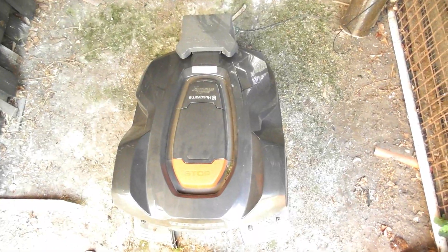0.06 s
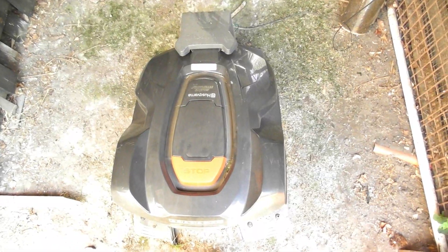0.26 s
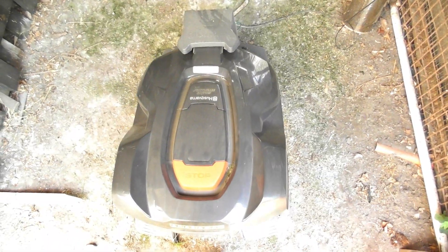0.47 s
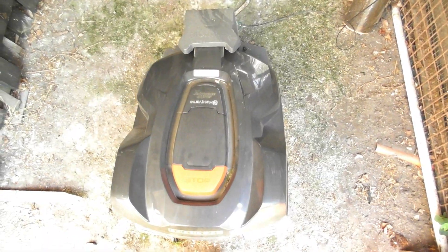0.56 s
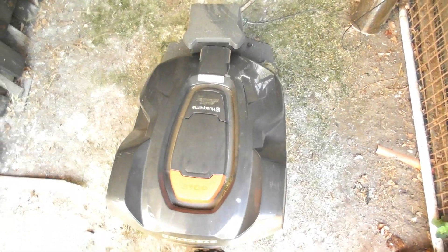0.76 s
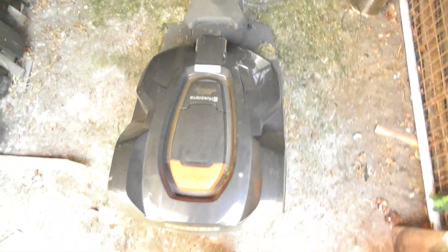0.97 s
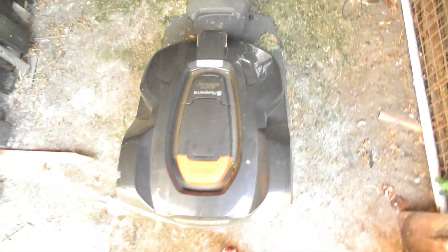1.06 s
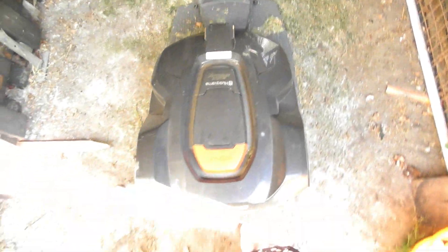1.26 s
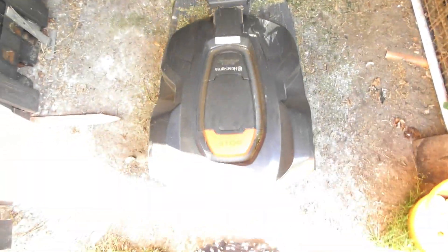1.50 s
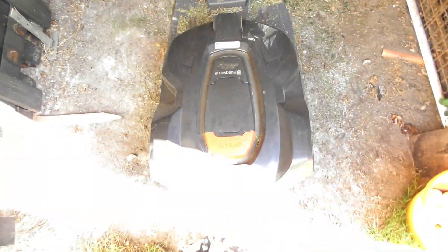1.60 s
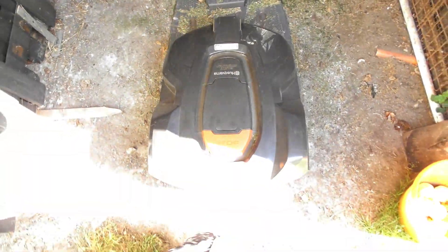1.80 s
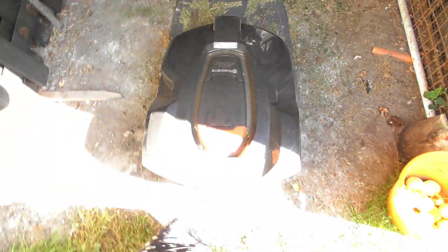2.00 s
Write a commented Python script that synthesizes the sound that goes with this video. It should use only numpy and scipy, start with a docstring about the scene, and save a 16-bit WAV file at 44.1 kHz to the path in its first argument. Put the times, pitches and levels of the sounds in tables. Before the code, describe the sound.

A robotic lawn mower knocks and clicks out of its dock, then rolls with low rumble

```python
"""A robotic lawn mower backs out of its charging dock in a garden and rolls over hard ground. Close by, hollow
knocks (bands of noise and ringing modes) and sharp plastic clicks crowd the first 0.8 s, then thin out. Random
bumps rumble in the shell over a soft bass, wavering tones make the low motor hum, and coloured random grains
make the gritty hiss and crunch. Faint falling chirps, sliding bands of noise, sound far off at the start and
again at about 1.3 s."""
import sys
import numpy as np
from scipy import signal
from scipy.fft import rfft, irfft, next_fast_len
from scipy.io import wavfile

SR = 44100
rng = np.random.default_rng(int(sys.argv[2]) if len(sys.argv) > 2 else 0)


def generate_wav(signal):
    """Clip the signal to [-1, 1] and save it as 16-bit WAV at the path in sys.argv[1]."""
    frames = np.transpose(np.atleast_2d(signal))
    scaled = np.clip(frames, -1, 1) * 32767
    pcm = np.round(scaled).astype(np.int16)
    wavfile.write(sys.argv[1], SR, pcm)


N = 90404
T = np.arange(N) / SR
SIZE = 2 * next_fast_len(N // 2 + SR // 4)  # FFT length, with room for filter tails
FREQS = np.maximum(np.arange(SIZE // 2 + 1) * SR / SIZE, 1)


def from_db(db):
    """Decibels to gain."""
    return 10 ** (np.asarray(db) / 20)


def rms_one(x):
    """Scale to rms 1."""
    return x / np.sqrt(np.mean(x ** 2) + 1e-20)


def level(rows):
    """Gain over time from (t/s, level/dB) rows."""
    return from_db(np.interp(T, *np.transpose(rows)))


def gains(points):
    """Gain over frequency from (f/Hz, level/dB) rows, drawn on a log frequency axis."""
    hz, db = np.transpose(points)
    return from_db(np.interp(np.log(FREQS), np.log(hz), db))


def colour(x, points, tilt_db=0):
    """Minimum-phase filter with the given spectrum and tilt in dB per octave; white noise keeps its power."""
    octaves = np.log2(np.maximum(FREQS, points[0][0]))
    gain = rms_one(gains(points) * from_db(tilt_db * octaves))
    # folding the cepstrum forward in time makes the filter causal
    cepstrum = irfft(np.log(gain + 1e-9))
    cepstrum[1:SIZE // 2] *= 2
    cepstrum[SIZE // 2 + 1:] = 0
    response = np.exp(rfft(cepstrum))
    return irfft(rfft(x, SIZE) * response)[..., :N]


def stereo(pair, width):
    """Left and right from a middle sound and an unrelated side sound, weighted by the width spectrum."""
    middle = pair[0]
    side = irfft(rfft(pair[1], SIZE) * gains(width))[:N]
    return np.array([middle + side, middle - side])


def drift(rate):
    """Random wander, rms 1, whose spectrum is 6 dB down at rate in Hz."""
    spectrum = rfft(rng.standard_normal(SIZE)) / (1 + (FREQS / rate) ** 2)
    return rms_one(irfft(spectrum)[:N])


def ring(x, hz, t60):
    """Two-pole resonator: a unit click sets a sine of initial height 1 ringing."""
    radius = from_db(-60 / (t60 * SR))
    angle = 2 * np.pi * hz / SR
    return signal.lfilter([0, np.sin(angle)], [1, -2 * radius * np.cos(angle), radius * radius], x + 1e-18)


def blow(s, t60, attack):
    """Envelope of a contact: quick attack, exponential decay."""
    age = np.maximum(T - s, 0)
    rise = np.sin(np.pi / 2 * np.minimum(age / attack, 1)) ** 2
    return rise * np.exp(-np.log(1000) * np.minimum(age / t60, 2))


def grains(per_s, spread_db):
    """Two random streams of tiny contacts of uneven size and either sign, rms 1."""
    sizes = from_db(spread_db * np.minimum(rng.exponential(1, (2, N)), 5))
    signed = sizes * rng.choice([-1, 1], (2, N))
    return rms_one(signed * (rng.random((2, N)) < per_s / SR))


def shudder(points):
    """Dense plastic modes as coloured noise with its beating evened out, rms 1."""
    x = colour(rng.standard_normal((2, N)), points)
    even = np.cos(np.angle(signal.hilbert(x, SIZE)))  # keep the phase, drop the envelope
    passband = np.minimum(gains(points) / gains(points).max() * 2, 1)
    return rms_one(irfft(rfft(even) * passband)[:, :N])


# hollow knocks: t/s, thud level/dB, clack level/dB, ring level/dB, f/Hz of the pitch that rings most
KNOCK_HITS = [(0.082, -36, -41, -59, 480), (0.096, -29.5, -29, -41, 840), (0.110, -33, -28, -27, 480),
              (0.118, -22, -20, -22, 460), (0.191, -44, -33, -44, 760), (0.264, -18.5, -31, -13, 523),
              (0.27, -25, -21.5, -23.5, 849), (0.306, -18, -37, -21.5, 412), (0.377, -20.5, -44, -39, 412),
              (0.403, -22, -37, -30, 302), (0.431, -23, -19.5, -23, 283), (0.482, -21.5, -23.5, -19, 350),
              (0.490, -28, -19, -39, 864), (0.519, -22, -40, -21.5, 350), (0.570, -18.5, -40, -24, 325),
              (0.598, -22, -31, -23.5, 480), (0.666, -20, -19, -24, 630), (0.683, -15, -25, -20.5, 329),
              (0.691, -20.5, -59, -16.5, 614), (0.709, -30, -34, -37, 596), (0.726, -18.5, -46, -27.5, 600),
              (0.790, -28, -33, -28, 687), (1.005, -36, -40.5, -29.5, 291), (1.026, -28, -48, -44, 435),
              (1.082, -27.5, -32.5, -48, 410), (1.160, -27.5, -37.5, -45, 680),
              (1.381, -25.5, -27.5, -39, 474), (1.399, -23, -35.5, -39, 415), (1.424, -24.5, -35, -39, 420),
              (1.458, -25.5, -38.5, -44, 358), (1.516, -28.5, -34.5, -34.5, 487),
              (1.783, -28, -44, -38, 480), (1.839, -46, -31.5, -60, 770), (1.986, -34, -45.5, -34, 490)]
# relative spectrum of the dead thud: f/Hz, level/dB
THUD_SPECTRUM = [(40, -55.5), (150, -11.5), (240, -6.5), (330, 0.5), (500, 6), (620, -3.5), (900, -22),
                 (1500, -41), (3000, -61.5)]
# relative spectrum of the clack: f/Hz, level/dB
CLACK_SPECTRUM = [(200, -31.5), (520, -12.5), (700, -5.5), (880, -2.5), (1150, -10), (1350, -14.5),
                  (1600, -62), (3000, -62)]
# hollow modes rung by the knocks, also heard in the rolling: f/Hz, relative level/dB, t60/s
SHELL_MODES = [(292.9, 5, 0.21), (347, 2.5, 0.31), (403.5, -32, 0.34), (475, 3, 0.098), (509, 1.5, 0.11),
               (589.6, -7, 0.41), (695.3, 4.5, 0.062), (785, 13, 0.065), (898, 13, 0.027), (1007, 0, 0.048)]
# stereo spread of the knocks, also used for the rolling: f/Hz, side level/dB against middle
BODY_SPREAD = [(50, -12.5), (150, -9.5), (350, -15.5), (600, -16), (1100, -9.5), (1500, -26)]
THUD_T60_S, CLACK_T60_S, KNOCK_ATTACK_S = 0.068, 0.059, 0.0042
RING_WIDTH_OCT, RING_FLOOR_DB = 0.14, -22.5  # how far a knock reaches to other modes
RING_WAVER_HZ, RING_WAVER_RATE_HZ = 4.02, 19.4
RING_LOW_HZ, RING_HIGH_HZ = 196, 1176
CLACK_LEFT_DB = 0.2  # left raised, right lowered by this


def knocks():
    """Each knock is a thud and a clack, and feeds hollow modes near its pitch; their energy adds up and dies
    away."""
    s, thud_db, clack_db, ring_db, pitch = np.transpose(KNOCK_HITS)
    thud_level = sum(from_db(db) * blow(at, THUD_T60_S, KNOCK_ATTACK_S) for at, db in zip(s, thud_db))
    clack_level = sum(from_db(db) * blow(at, CLACK_T60_S, KNOCK_ATTACK_S) for at, db in zip(s, clack_db))
    thud = thud_level * shudder(THUD_SPECTRUM)
    clack = clack_level * shudder(CLACK_SPECTRUM)
    rings = 0
    for hz, db, t60 in SHELL_MODES:
        near = np.exp(-(np.log2(hz / pitch) / RING_WIDTH_OCT) ** 2) + from_db(RING_FLOOR_DB)
        hits = np.bincount((s * SR).astype(int), (from_db(ring_db + db) * near) ** 2, N)
        energy = signal.lfilter([1], [1, -np.exp(-2 * np.log(1000) / (t60 * SR))], hits + 1e-18)
        wavering_hz = hz + RING_WAVER_HZ * drift(RING_WAVER_RATE_HZ)
        cycles = np.cumsum(wavering_hz) / SR + rng.random((2, 1))
        rings = rings + np.sqrt(energy) * np.sin(2 * np.pi * cycles)
    band = signal.butter(5, [RING_LOW_HZ, RING_HIGH_HZ], "band", fs=SR, output="sos")
    rings = signal.sosfilt(band, rings)
    clack_balance = from_db([[CLACK_LEFT_DB], [-CLACK_LEFT_DB]])
    return stereo(thud + rings, BODY_SPREAD) + stereo(clack, BODY_SPREAD) * clack_balance


# sharp clicks: t/s, level/dB, t60/s, tilt/dB per octave, sparkle level/dB
CLICK_HITS = [(0.101, -46, 0.21, 2.5, -3), (0.1259, -33.5, 0.066, 9, -21), (0.191, -46.5, 0.02, 0, -6),
              (0.2612, -28.5, .045, 0.5, -1), (0.288, -39, 0.054, 5, -12), (0.3263, -39, 0.029, 11, -3),
              (0.4297, -37.5, 0.037, -1.5, 9), (0.4811, -33.5, 0.029, -4.5, 10),
              (0.5735, -40.5, 0.071, -7.5, -2), (0.665, -34.5, .06, -2, 9), (0.674, -38.5, 0.052, 0, 2),
              (0.687, -30.5, 0.057, -9, 12), (0.691, -46, 0.024, 0, 13), (0.786, -47.5, .04, 2, -4),
              (0.949, -50.5, .12, 8, 0), (1.022, -44.5, 0.02, 13, -7), (1.603, -45.5, 0.026, -5.5, 2)]
# relative spectrum of the crack, before tilt and sparkle: f/Hz, level/dB
CRACK_SPECTRUM = [(600, -11), (1700, -5.5), (2400, -8.5), (3500, 1), (4400, -1.5), (5100, -6), (6200, 1.5),
                  (7700, 1.5), (8700, -1), (9600, -8.5), (12000, -11.5), (15500, -24)]
# ringing small hard parts: f/Hz, level/dB against the click before the overall ring level and tilt, t60/s
HARD_PART_MODES = [(2720, -15, .1), (3400, -16, .05), (3664, -7, 0.022), (4570, -14, 0.044),
                   (5800, -8.5, 0.042), (6420, -21, 0.056), (7000, -33, .07), (7770, -3, 0.062),
                   (8780, -8, 0.034)]
# stereo spread of the clicks: f/Hz, side level/dB against middle
CLICK_SPREAD = [(1800, -2), (2500, -14), (3400, -14.5), (5000, -21), (6500, -22), (8500, -7), (11000, 2),
                (15000, -1)]
CLICK_TAIL_DB, CLICK_TAIL_T60_S, ATTACK_S = -11, 0.21, 0.0019
CLICK_GRAINS_PER_S, CLICK_SPREAD_DB = 18000, 2
SPARKLE_HZ, CLICK_RING_DB = 10500, -5


def clicks():
    """Hard plastic snaps: a gritty crack with a faint tail, more or less sparkle on top, and a short bright ring."""
    out = np.zeros((2, N))
    for s, db, t60, tilt_db, sparkle_db in CLICK_HITS:
        tail = from_db(CLICK_TAIL_DB) * blow(s, CLICK_TAIL_T60_S, ATTACK_S)
        envelope = blow(s, t60, ATTACK_S) + tail
        spectrum = [(hz, band_db + sparkle_db * (hz > SPARKLE_HZ)) for hz, band_db in CRACK_SPECTRUM]
        crack = envelope * grains(CLICK_GRAINS_PER_S, CLICK_SPREAD_DB)
        out += from_db(db) * colour(crack, spectrum, tilt_db)
    s, db, _, tilt_db, _ = np.transpose(CLICK_HITS)
    for hz, mode_db, t60 in HARD_PART_MODES:
        hits = np.zeros(N)
        tilted = np.minimum(tilt_db * np.log2(hz / 7000), 3)  # each click's tilt, pivoting at 7 kHz
        # each mode starts one to two attack times into the click
        starts = s + ATTACK_S * rng.uniform(1, 2, len(s))
        hits[(starts * SR).astype(int)] = from_db(db + CLICK_RING_DB + mode_db + tilted)
        out[0] += ring(hits, hz, t60)
    return stereo(out, CLICK_SPREAD)


# level of the rolling rumble, before the shell ring is added: t/s, level/dB
ROLL_LEVEL = [(0, -49), (.07, -52), (.14, -30), (.24, -39), (.33, -33), (.45, -29.5), (.6, -28.5),
              (.74, -31), (.9, -40.5), (1.05, -36.5), (1.15, -38), (1.42, -35.5), (1.57, -36), (1.65, -33),
              (1.9, -40.5), (2.05, -39.5)]
# relative spectrum of the rumble: f/Hz, level/dB
RUMBLE_SPECTRUM = [(60, -11.5), (230, -6.5), (290, -0.5), (380, 0), (470, -0.5), (590, -9.5), (880, -7),
                   (1120, -15.5), (1300, -30.5), (1600, -38.5), (3000, -44.5)]
# level of the bass: t/s, level/dB
BASS_OVER_TIME = [(0, -46.5), (.25, -43.5), (.45, -48), (.55, -61), (.65, -36), (.78, -44), (.9, -50),
                  (1.3, -39), (1.65, -48.5), (2.05, -48)]
# relative spectrum of the bass: f/Hz, level/dB
BASS_SPECTRUM = [(15, 15), (30, -11), (43, 1), (55, -1.5), (82, 9.5), (135, -8), (175, 7.5), (230, -11),
                 (500, 0.5), (1500, -38.5)]
BUMPS_PER_S, BUMP_SPREAD_DB, ROLL_RING_DB = 900, 1.36, -8.5


def rolling():
    """Small bumps under the wheels rumble through the shell and ring its modes, over a soft noise bass."""
    bumps = grains(BUMPS_PER_S, BUMP_SPREAD_DB)
    body = colour(bumps, RUMBLE_SPECTRUM)
    rings = rms_one(sum(from_db(db) * ring(bumps, hz, t60) for hz, db, t60 in SHELL_MODES))
    rings = signal.sosfilt(signal.butter(6, 1100, fs=SR, output="sos"), rings)
    rumble = level(ROLL_LEVEL) * (body + from_db(ROLL_RING_DB) * rings)
    bass = level(BASS_OVER_TIME) * colour(rng.standard_normal((2, N)), BASS_SPECTRUM)
    return stereo(rumble + bass, BODY_SPREAD)


# tones of the drive hum, around which pitch and level waver: f/Hz, rms level/dB
HUM_TONES = [(94, -51), (116, -52.5), (156, -49), (214, -56.5), (296, -49.5), (415, -49), (474, -50.5)]
HUM_WAVER_HZ, HUM_WAVER_DB = 4.05, 3  # rms wander of pitch and level
HUM_START_S, HUM_RISE_S = 0.11, 0.29


def hum():
    """The drive motors come up and hum in a few sine tones of unsteady pitch and level."""
    out = 0
    for hz, db in HUM_TONES:
        phase = 2 * np.pi * np.cumsum(hz + HUM_WAVER_HZ * drift(16.8)) / SR
        strength = np.sqrt(2) * from_db(db + HUM_WAVER_DB * drift(2.3))
        out = out + strength * np.sin(phase)
    return out * np.clip((T - HUM_START_S) / HUM_RISE_S, 0, 1)


# level of the gritty hiss: t/s, level/dB
HISS_OVER_TIME = [(0, -61.5), (.24, -62.5), (.35, -56), (.6, -58.5), (.66, -45), (.76, -58), (.94, -53),
                  (.98, -48), (1.12, -57), (1.28, -60), (1.35, -53), (1.47, -58.5), (1.6, -49.5),
                  (1.78, -57.5), (1.96, -57.5), (2.05, -59.5)]
# relative spectrum of the hiss: f/Hz, level/dB
HISS_SPECTRUM = [(1500, -17), (4200, -16), (5200, -16), (6200, -5.5), (7600, 1.5), (9200, -3.5),
                 (11000, -11.5), (15500, -20)]
# level of the lower crunch under the wheels: t/s, level/dB
CRUNCH_OVER_TIME = [(0, -66), (.16, -54), (.24, -59), (.36, -52.5), (.7, -47), (.83, -55), (1.0, -52.5),
                    (1.28, -59), (1.37, -49.5), (1.47, -57), (1.57, -52.5), (1.61, -48.5), (1.7, -61.5),
                    (1.82, -53.5), (2.05, -61)]
# relative spectrum of the crunch: f/Hz, level/dB
CRUNCH_SPECTRUM = [(700, 21), (1700, 5), (2500, -2.5), (3600, 4.5), (4400, 6.5), (5200, -16.5), (7000, 0.5),
                   (14000, -34)]
# stereo spread of the grit: f/Hz, side level/dB against middle
GRIT_SPREAD = [(1700, -12), (2500, -26), (6000, -59), (8000, -12.5), (10500, 1.5), (15000, 4)]
HISS_GRAINS_PER_S, CRUNCH_GRAINS_PER_S, GRAIN_SPREAD_DB = 7000, 3000, 2


def grit():
    """Fine grit hisses and crunches on the ground: two coloured streams of tiny contacts."""
    hiss = colour(grains(HISS_GRAINS_PER_S, GRAIN_SPREAD_DB), HISS_SPECTRUM)
    crunch = colour(grains(CRUNCH_GRAINS_PER_S, GRAIN_SPREAD_DB), CRUNCH_SPECTRUM)
    return stereo(level(HISS_OVER_TIME) * hiss + level(CRUNCH_OVER_TIME) * crunch, GRIT_SPREAD)


# parts of the faint far chirps: t/s, length/s, start f/Hz, end f/Hz, level/dB before fading in and out
CHIRP_SLIDES = [(0.0, 0.073, 4800, 3900, -64), (0.0, .08, 6470, 6350, -65),
                (1.305, 0.057, 4350, 4090, -58.5), (1.321, .08, 3730, 3500, -59),
                (1.351, .05, 6160, 5730, -57.5)]
CHIRP_ROUGH_HZ = 300


def chirps():
    """Faint, hoarse falling chirps: narrow bands of noise that slide down."""
    out = 0
    for s, length, start_hz, end_hz, db in CHIRP_SLIDES:
        along = np.clip((T - s) / length, 0, 1)
        phase = 2 * np.pi * np.cumsum(start_hz + (end_hz - start_hz) * along) / SR
        voice = drift(CHIRP_ROUGH_HZ) * np.sin(phase) + drift(CHIRP_ROUGH_HZ) * np.cos(phase)
        fade = np.sqrt(np.abs(np.sin(np.pi * along)))
        out = out + from_db(db) * fade * voice
    return out


LEFT_DB = 0.36  # left raised, right lowered by this


def scene():
    """The knocks, rolling and hum lie a little to the left, with the chirps in the middle."""
    left_leaning = (knocks() + rolling() + hum()) * from_db([[LEFT_DB], [-LEFT_DB]])
    return left_leaning + clicks() + grit() + chirps()


NOTCH_HZ, NOTCH_Q = 1412, 3.06
LOW_CUT_HZ, CUTOFF_HZ = 33, 15900


def record(dry):
    """The microphone has a notch in the mids; the deep bass and the top are cut."""
    notched = signal.lfilter(*signal.iirnotch(NOTCH_HZ, NOTCH_Q, fs=SR), dry)
    low_cut = signal.sosfilt(signal.butter(2, LOW_CUT_HZ, "high", fs=SR, output="sos"), notched)
    return signal.sosfilt(signal.ellip(12, .1, 80, CUTOFF_HZ, fs=SR, output="sos"), low_cut)


dry = scene()
out = record(dry)
generate_wav(out)
```